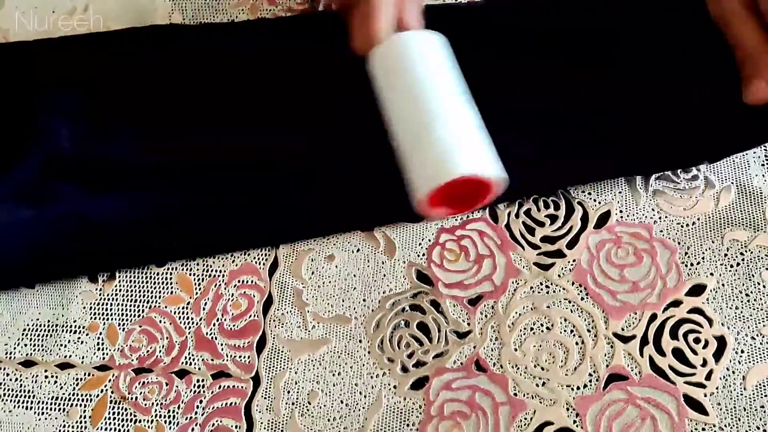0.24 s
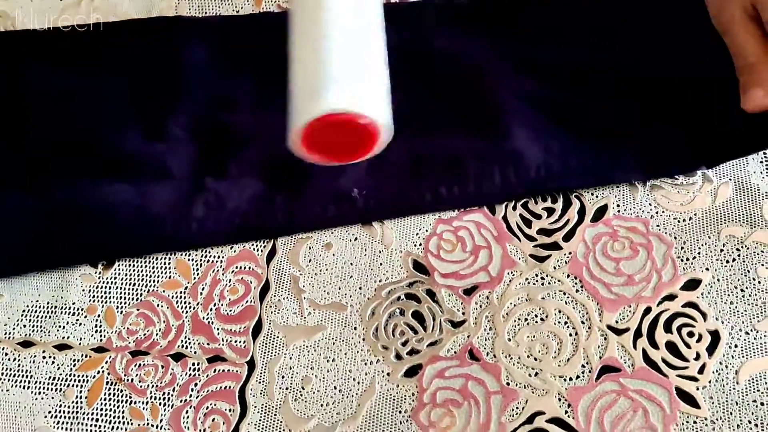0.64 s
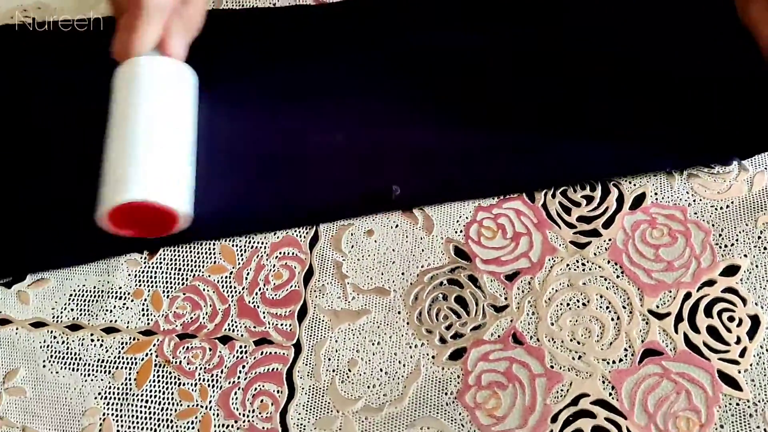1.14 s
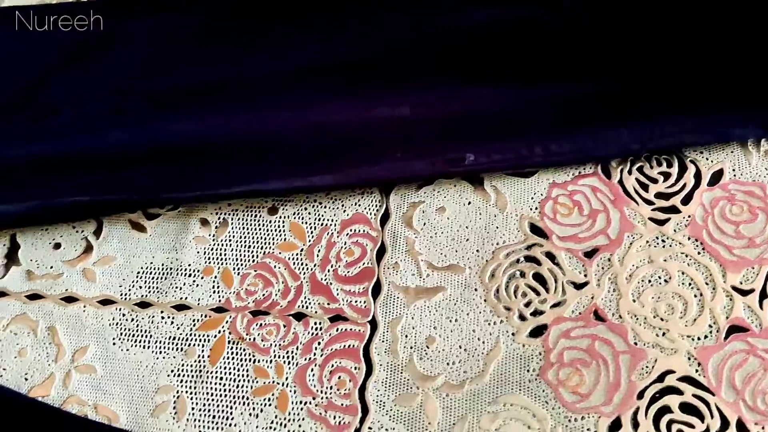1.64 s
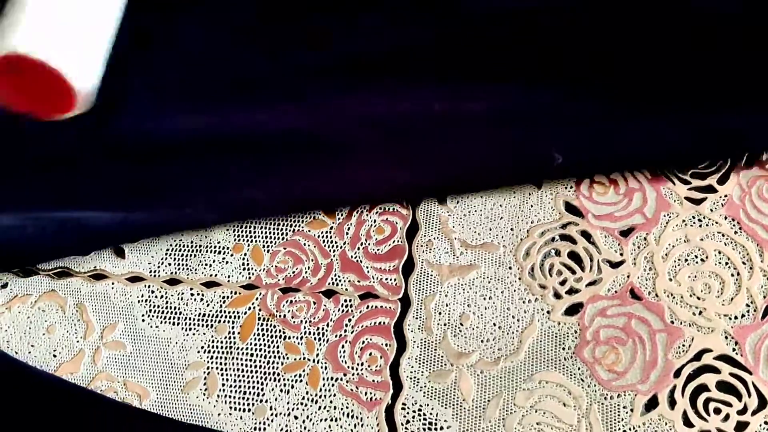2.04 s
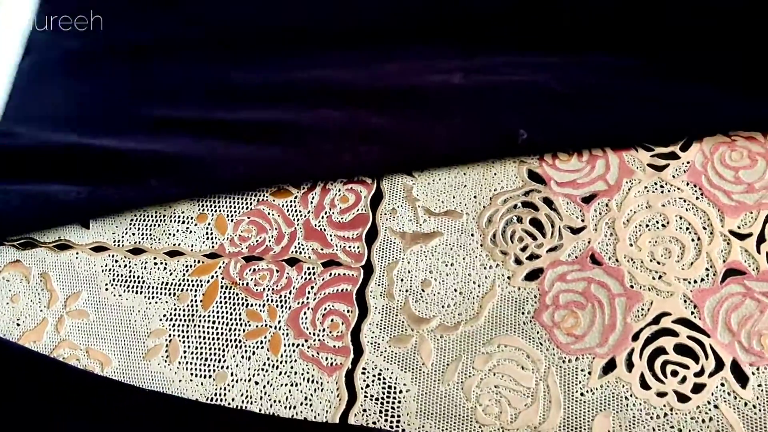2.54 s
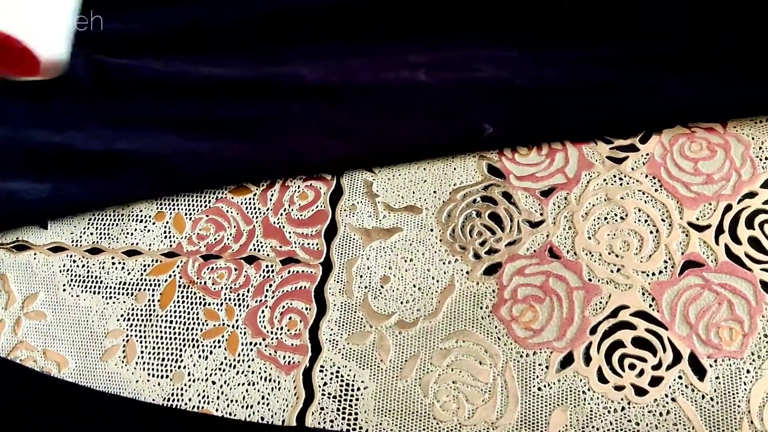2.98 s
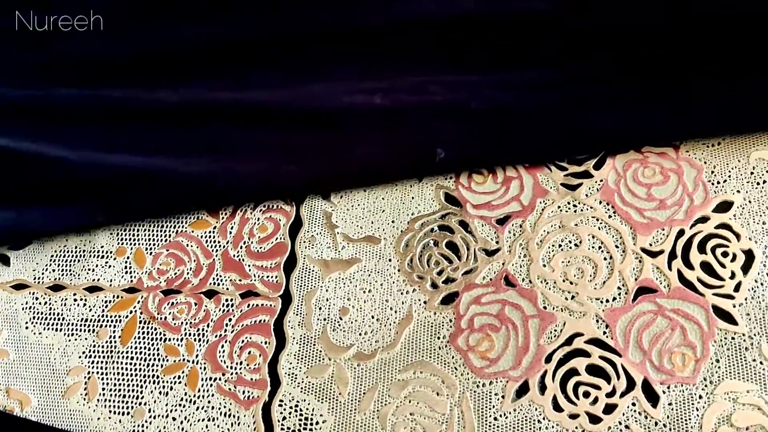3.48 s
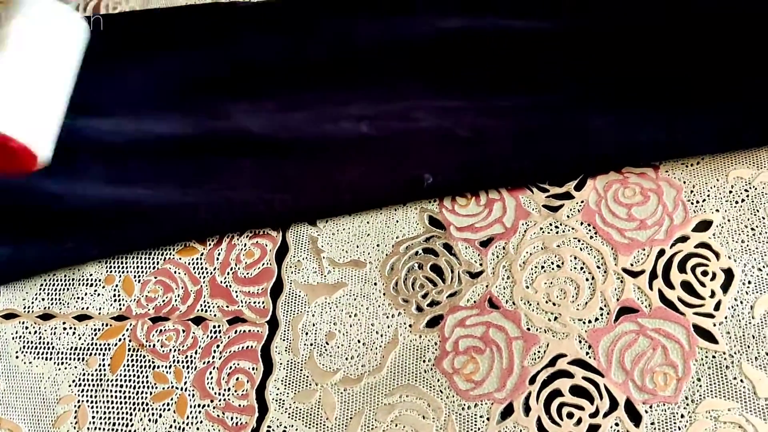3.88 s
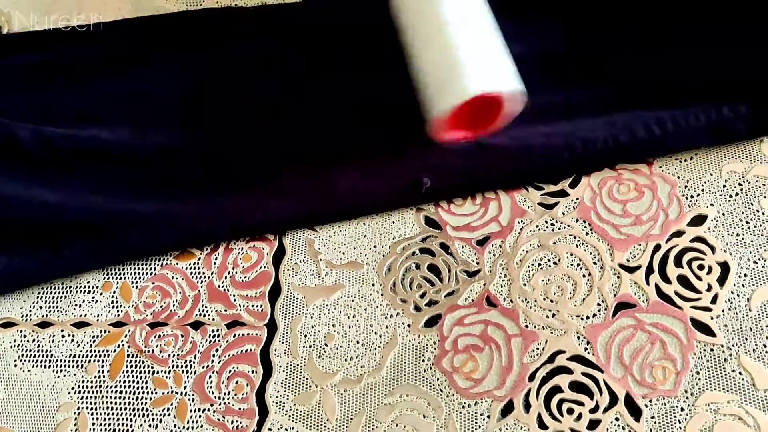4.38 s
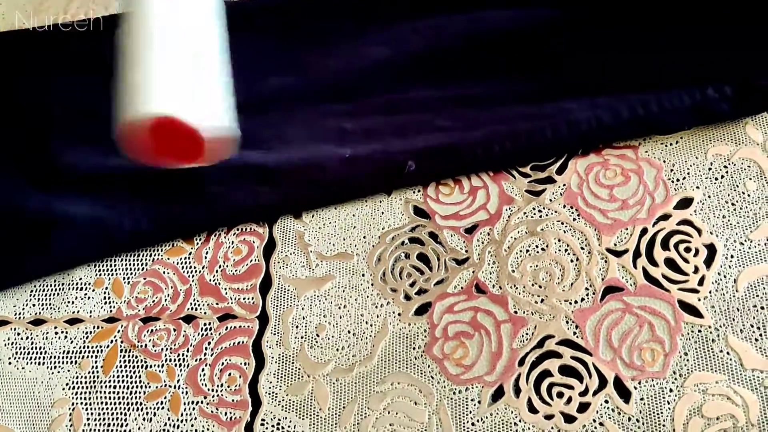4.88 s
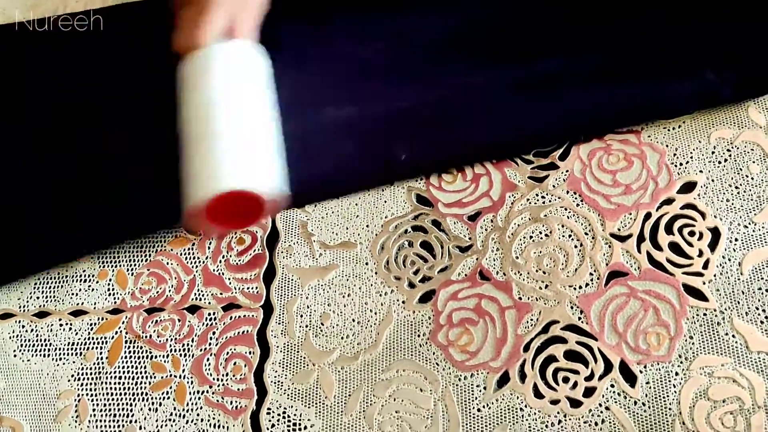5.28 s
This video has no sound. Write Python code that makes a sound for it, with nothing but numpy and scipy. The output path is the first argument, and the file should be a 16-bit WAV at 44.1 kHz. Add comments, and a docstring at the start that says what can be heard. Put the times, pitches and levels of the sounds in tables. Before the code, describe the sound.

Close stereo pickup in a small, faintly humming room: a sticky lint roller makes six short strokes on a cloth-covered table. Each is a crackling, peeling hiss over low rumble, the first gentlest, later ones heavier. The roller lands with dull thumps and plastic clicks between strokes; brief tiny squeaks come early, and wooden knocks sound off to the left after the second and fourth strokes. The last stroke is cut off.

```python
"""Lint roller on a cloth-covered table

A sticky lint roller is set down on the cloth and pushed along it in six strokes, the last cut off by the end.
Landings are force pulses and rolling is random kicks, both heard through the modes of the table top.
The tape peels off the fibres with a crackling hiss: countless random snaps, coloured and swelling per stroke.
The plastic core clicks and squeaks as decaying modes and short tones; wooden knocks off to the left are
filtered impulses with a ring. Noise and steady tones make a small, faintly humming room."""
import sys
import numpy as np
from scipy import signal
from scipy.fft import rfft, irfft, next_fast_len
from scipy.io import wavfile
from scipy.ndimage import uniform_filter1d, map_coordinates

SR = 44100
rng = np.random.default_rng(int(sys.argv[2]) if len(sys.argv) > 2 else 0)


def dump(signal):
    """Clip the signal to [-1, 1] and save it as 16-bit WAV at the path in sys.argv[1]."""
    limited = np.clip(np.atleast_2d(signal).T, -1, 1)
    pcm = np.round(limited * 32767).astype(np.int16)
    wavfile.write(sys.argv[1], SR, pcm)


N = 243431

# strokes of the roller, levels relative, fall_s for 20 dB of hiss, leads of the left microphone:
# start_s, stop_s, hiss_db, rumble_db, pressure_gained_db, fall_s, first_lead_ms, last_lead_ms
STROKES = [(0.049, 0.488, -54, -50.5, 4, 0.0959, 0.305, -0.029),
           (1.151, 1.605, -49, -41.5, 2, 0.2172, 0.064, 0.3096),
           (2.473, 2.796, -49, -40.5, -2.5, 0.1232, 0.0865, 0.2747),
           (3.365, 3.631, -47.5, -37, -0.14, 0.1823, 0.1314, .32),
           (4.505, 4.789, -47.5, -32, 1, 0.1042, -0.045, 0.2523),
           (5.321, 5.617, -49, -32.5, -1.5, -0.05, -0.0413, 0.283)]
# relative spectrum of tape peeling off cloth: pitch_hz, level_db (per Hz)
PEEL_SPECTRUM = [(100, -35.5), (450, -9), (750, 6.5), (1200, 3.5), (2000, 4), (3500, 3), (5000, 3.5),
                 (6700, 4.5), (9000, -1.5), (15000, -14.5)]


def amp(db):
    """The decibel law: level to amplitude gain."""
    return 10 ** (np.asarray(db) / 20)


def unit(x):
    """Normalisation by mean power: scaled to rms 1."""
    return x / np.sqrt(np.mean(x ** 2) + 1e-20)


def clock(count):
    """Uniform sampling: seconds for count samples."""
    return np.arange(count) / SR


def along(points, hz):
    """Logarithmic pitch scale: (Hz, value) points interpolated on it."""
    f, v = np.transpose(points)
    return np.interp(np.log(hz + 1), np.log(f + 1), v)


def wobble(rate):
    """Band-limited randomness: a smooth curve through rate random knots a second."""
    knots = rng.standard_normal(int(N * rate / SR) + 4)
    return map_coordinates(knots, [clock(N) * rate])


def swell(start, stop, rise_s, fall_s):
    """Exponential growth and decay: gain 1 from start to stop; rise and fall are times for 20 dB."""
    t = clock(N)
    before = np.maximum(start - t, 0) / rise_s
    after = np.maximum(t - stop, 0) / fall_s
    return amp(-20 * (before + after))


def filtered(x, response):
    """Linear filtering: the spectrum of x times a response of frequency."""
    n = x.shape[-1]
    m = next_fast_len(n + SR // 2)
    return irfft(rfft(x, m) * response(np.fft.rfftfreq(m, 1 / SR)), m)[..., :n]


def stereo(pair, spectrum):
    """Interchannel coherence: two unrelated signals become coloured left and right, rms 1, alike in the bass."""
    # left-right likeness: pitch_hz, correlation
    likeness = [(60, 0.96), (130, 0.993), (290, 0.883), (640, 0.358), (1400, 0.018), (3000, 0.067)]

    def turn(hz):
        return np.arccos(np.clip(along(likeness, hz), -1, 1)) / 2

    def mid_side(hz):
        return amp(along(spectrum, hz)) * [np.cos(turn(hz)), np.sin(turn(hz))]

    mid, side = filtered(pair, mid_side)
    return unit(np.array([mid + side, mid - side]))


def patchy(x, depth_db):
    """Time-varying spectrum: a smooth random field shifts the colour of x from moment to moment."""
    z = signal.stft(x, nperseg=512)[2]
    field = uniform_filter1d(rng.standard_normal(z.shape), size=9, axis=0)  # across frequency
    field = uniform_filter1d(field, size=11, axis=1)  # across time
    return signal.istft(z * amp(depth_db * unit(field)), nperseg=512)[1][:N]


def ring(hz, t60):
    """Damped vibration: one mode that falls 60 dB in t60 seconds."""
    t = clock(SR // 2)
    return np.sin(2 * np.pi * hz * t) * np.exp(-np.log(1000) * t / t60)


def blow(spectrum, size=SR // 2):
    """Minimum phase: a folded cepstrum gives a causal impulse of the given colour, peak 1."""
    cepstrum = irfft(np.log(amp(along(spectrum, np.fft.rfftfreq(size, 1 / SR)))), size)
    cepstrum[1:size // 2] *= 2
    cepstrum[size // 2:] = 0
    pulse = irfft(np.exp(rfft(cepstrum)), size)
    return pulse / np.abs(pulse).max()


def add(track, s, sound):
    """Superposition: a sound mixed into the track at time s."""
    part = track[:, round(s * SR):][:, :sound.shape[-1]]
    part += sound[..., :part.shape[-1]]


def room(x, early_db=5, early_s=0.048):
    """Reverberation: convolution with decaying noise, stronger early on, whose decay depends on pitch."""
    # decay of the room: pitch_hz, t60_s
    wall_decay = [(100, 0.124), (500, 0.573), (1400, 0.3866), (4000, 0.392), (10000, 0.217)]
    noise = stereo(rng.standard_normal((2, SR // 2)), [(100, 0)])
    hz, t, z = signal.stft(noise, SR, nperseg=256)
    decay = np.exp(-np.log(1000) * t / along(wall_decay, hz)[:, None])
    tail = signal.istft(z * decay, SR, nperseg=256)[1]
    t = clock(tail.shape[1])
    tail *= amp(early_db * np.exp(-t / early_s))
    tail *= np.clip((t - .004) / .004, 0, 1)  # silent for 4 ms, then fades in over 4 ms
    return signal.fftconvolve(x[None], unit(tail) / np.sqrt(len(t)), axes=1)


def background():
    """Stationary noise and phase-modulated tones: room air, an appliance's unsteady hum and a thin whine."""
    # room air, relative spectrum: pitch_hz, level_db (per Hz)
    air_spectrum = [(15, -8.5), (30, -3.5), (55, -0.5), (120, -19), (200, -13), (450, -23.5), (740, -20),
                    (1100, -30), (2000, -34.5), (2700, -38), (7000, -46), (15000, -54)]
    # hum of the appliance, relative levels: pitch_hz, level_db
    hum_tones = [(177.6, -64), (247.6, -68)]
    # the whine swells once, times for 20 dB: peak_s, level_db, rise_s, fall_s
    whine_swell = (4.0, -57.5, 0.2, 0.04)
    whine_hz, whine_idle_db = 749.8, -72

    def tone(hz):
        return np.sin(2 * np.pi * hz * clock(N) + 0.53 * wobble(7))

    drift = amp(1.3 * wobble(6))
    air = amp(-49.5) * stereo(rng.standard_normal((2, N)), air_spectrum)
    hum = sum(amp(db) * tone(hz) for hz, db in hum_tones)
    s, db, rise_s, fall_s = whine_swell
    whine = np.maximum(amp(whine_idle_db), amp(db) * swell(s, s, rise_s, fall_s))
    return drift * (air + hum) + whine * tone(whine_hz)


def knocks():
    """Impact and resonance with an arrival-time difference: wood knocks further off, left first, in the room."""
    # wooden knocks, ring level relative to the strike: start_s, level_db, ring_hz, ring_db, ring_t60_s
    wood_knocks = [(1.5905, -28, 882, 1, 0.044), (1.5963, -19, 505.5, 2.5, 0.0309),
                   (1.6185, -34, 760.3, 7, 0.232), (1.738, -37.5, 936.6, -6, 0.107),
                   (3.6432, -21.5, 1023, 3.5, 0.0315), (3.6515, -19, 550, -11.5, 0.093),
                   (3.662, -28, 681, -5, 0.26), (4.1275, -34.5, 572.8, 5, 0.1715),
                   (4.134, -33, 323.5, -3, 0.088)]
    # strike of wood, relative spectrum: pitch_hz, level_db (per Hz)
    wood_spectrum = [(60, -4), (200, -6), (480, 0), (800, 3.5), (1100, -3.5), (1350, -12), (1650, -6.5),
                     (2100, -15.5), (2800, -13.5), (4500, -27), (7500, -29.5), (15000, -47.5)]
    out, lead_s = np.zeros((2, N)), .00033
    for s, db, hz, ring_db, t60 in wood_knocks:
        strike = amp(db) * blow(wood_spectrum)
        knock = strike + amp(db + ring_db) * ring(hz, t60)
        t = clock(len(knock))
        late = np.interp(t - lead_s, t, knock, left=0)
        add(out, s, np.array([knock, late]))
        strike_echo = amp(5.5) * room(strike, early_db=10, early_s=0.00996)
        add(out, s, strike_echo + amp(-11.5) * room(knock))
    return out


def place():
    """Kinematics as the left microphone's lead in ms: the roller crosses, slows, rests, goes to its next start."""
    slowing = .2  # starts faster and ends slower than the mean speed by this share of it
    overrun_s, rest_s = 0.0375, 0.142  # travel beyond each end of a stroke, and the stay there
    times, leads = [], []
    for start, stop, *_, first_ms, last_ms in STROKES:
        s = np.linspace(start - overrun_s, stop + overrun_s)
        u = (s - start) / (stop - start)
        lead_ms = first_ms + (last_ms - first_ms) * (u + slowing * u * (1 - u))
        times += [s[0] - rest_s, *s, s[-1] + rest_s]
        leads += [lead_ms[0], *lead_ms, lead_ms[-1]]
    return np.interp(clock(N), times, leads)


def from_roller(x, pan_db_per_ms=15, offset_db=-3.0):
    """Interaural cues: lead shifts arrival and level between the microphones, plus a fixed level offset."""
    lead_ms, half = place(), np.array([[.5], [-.5]])  # left, right
    when = np.arange(N) + half * lead_ms * SR / 1000
    pair = np.array([map_coordinates(x, [w]) for w in when])
    return pair * amp(half * (offset_db + pan_db_per_ms * lead_ms))


def core():
    """Modal excitation: the loose plastic core clicks on its handle and sometimes squeaks on its axle."""
    # clicks on the handle, relative levels, modes weaken above dull_hz: start_s, level_db, dull_hz
    core_clicks = [(.416, -26, 600), (0.63, -43.5, 1800), (.974, -33.5, 1000), (2.344, -33, 3004),
                   (3.243, -40, 3000), (3.519, -22.5, 555), (4.327, -20, 9000), (4.338, -30.5, 9000),
                   (4.729, -34.5, 700), (5.1732, -19, 5470)]
    # modes of the core, relative levels: pitch_hz, level_db, t60_s
    core_modes = [(659.6, -9.5, 0.0253), (973, 3, 0.0106), (1104, -18.5, 0.099), (1300, 3.5, 0.00227),
                  (1792.6, -13.5, 0.0416), (2414, -2.5, 0.00338), (2926, -13.5, 0.015), (4910, -22.5, .015),
                  (6760, -32.5, .012)]
    # squeaks on the axle, length from the centre to 1/e: centre_s, level_db, pitch_hz, length_s
    axle_squeaks = [(0.737, -54, 2480, 0.00405), (0.748, -48, 2600, 0.00227), (0.971, -52, 2308, 0.0051)]
    direct, echo, t = np.zeros((1, N)), np.zeros((2, N)), clock(N)
    for s, db, dull_hz in core_clicks:
        click = 0
        for k, (hz, level, t60) in enumerate(core_modes):
            gain = amp(db + level + rng.normal(0, 1))
            gain /= 1 + (hz / dull_hz) ** 2  # a soft contact barely excites the high modes
            click = click + (-1) ** k * gain * ring(hz, t60)  # neighbours swing in opposite directions
        add(direct, s, click)
        add(echo, s, amp(-7.5) * room(click))
    squeak = 0
    for s, db, hz, length in axle_squeaks:
        envelope = np.exp(-((t - s) / length) ** 2)
        squeak = squeak + amp(db) * envelope * np.sin(2 * np.pi * hz * t + 1.28 * wobble(560))
    return from_roller(direct[0] + squeak, pan_db_per_ms=6, offset_db=-.6) + echo


def table_top(force):
    """Modal superposition: a force is heard directly and through the modes of the table top."""
    # modes of the table top, gain at resonance relative to the direct force: pitch_hz, gain_db, t60_s
    table_modes = [(45, 17.5, 0.684), (92.725, 12, 0.762), (100.74, 0, 0.231), (116.65, 1, 0.62),
                   (128.62, 3.5, 0.344), (173.13, 7.5, 0.358), (207.38, 0, 0.216), (223.1, -8, 0.228),
                   (270.9, -6.5, 0.66), (295.16, 5, 0.366), (344.3, 1.5, 0.214), (392.2, -5, 0.4),
                   (482, -23.5, 0.6), (570, -16.5, 0.57)]
    response = 0
    for hz, db, t60 in table_modes:
        per_sample = 2 * np.log(1000) / (t60 * SR)  # evens out long and short rings
        response = response + amp(db) * per_sample * ring(hz, t60)
    response[0] += 1
    return signal.fftconvolve(force, response[None], axes=1)[:, :force.shape[1]]


def landings():
    """Contact time sets bandwidth: the padded roller pushes the table down and it springs back."""
    # landings, peak force as a relative level, time scale of the contact: centre_s, level_db, contact_s
    roller_landings = [(0.017, -41.5, 0.036), (0.112, -40, 0.0096), (0.9728, -24, 0.003104),
                       (2.3449, -12, 0.00195), (3.2425, -14, 0.002405), (4.3255, -26, 0.00341),
                       (5.1655, -20.5, 0.002775)]
    force = np.zeros(N)
    for s, db, contact in roller_landings:
        u = (clock(N) - s) / contact
        push = u / (1 + u ** 2) ** 4  # one smooth down-and-up swing
        force += amp(db) * push / push.max()
    return table_top(force[None]) + amp(-10) * room(force)[:, :N]


def effort():
    """Envelopes of hiss and rumble: each stroke runs up, changes with pressure and runs out; hiss also arches."""
    run_up_share = 0.3003  # the last 20 dB are gained in this share of a stroke's length
    arch_db = 1.26  # mid-stroke hiss above that at the ends, apart from pressure
    lean_s, ease_s = 0.0279, 0.0413  # the hand's weight comes on late and off early
    rumble_fall_s = 0.172  # for 20 dB
    rumble_grows = 1.19  # dB of rumble per dB of pressure
    hiss, rumble = amp(-80.5), amp(-60.5)  # floors: cloth and table between the strokes
    for start, stop, hiss_db, rumble_db, press_db, fall_s, _, _ in STROKES:
        u = np.interp(clock(N), [start, stop], [0, 1])
        pressure_db = press_db * (u - .5)
        mid_db = arch_db * (np.sin(np.pi * u) - 2 / np.pi)
        rise_s = run_up_share * (stop - start)
        stroke_hiss = amp(hiss_db + pressure_db + mid_db) * swell(start, stop, rise_s, fall_s)
        weight = swell(start + lean_s, stop - ease_s, rise_s, rumble_fall_s)
        hiss = np.maximum(hiss, stroke_hiss)
        rumble = np.maximum(rumble, amp(rumble_db + rumble_grows * pressure_db) * weight)
    return hiss, rumble


def rolling():
    """Random impact excitation: folds kick the table, more crisply under pressure; deep sway varies less."""
    # kicks of the folds, relative spectrum: pitch_hz, level_db (per Hz)
    bump_spectrum = [(20, -28.5), (45, -7), (80, -1), (130, 3.5), (200, 0), (300, -6), (450, -14.5),
                     (800, -19), (1500, -51.5), (4000, -88)]
    # deep sway of the table, relative spectrum: pitch_hz, level_db (per Hz)
    sway_spectrum = [(15, -38.5), (35, -2.5), (50, -1.5), (70, -5.5), (110, -15.5), (250, -41.5),
                     (1000, -93)]
    # above firm_db of rumble, bumps above firm_hz gain this many extra dB per dB
    firm_db, firm_hz, brightens = -37.5, 231, 0.177
    pressure_db = 20 * np.log10(effort()[1])
    folds = (rng.random(N) < 110 / SR) * rng.choice([-1, 1], N)  # 110 a second on average
    kicks = np.array([unit(folds) + .6 * rng.standard_normal(N), rng.standard_normal(N)])
    bumps = unit(table_top(stereo(kicks, bump_spectrum)))
    dull = filtered(bumps, lambda hz: 1 / (1 + (hz / firm_hz) ** 8))
    bumps = dull + (bumps - dull) * amp(brightens * np.maximum(pressure_db - firm_db, 0))
    sway = unit(table_top(stereo(rng.standard_normal((2, N)), sway_spectrum)))
    bump_gain = amp(pressure_db + 0.96 * wobble(40))
    sway_gain = amp(0.4415 * pressure_db - 26.5)
    return bump_gain * bumps + sway_gain * sway


def crackle(fibres_per_s, size_db, clump_db):
    """Shot noise: countless fibres snap free of the glue, in clumps of a few milliseconds; rms 1."""
    sizes = rng.standard_normal(N) * amp(size_db * rng.standard_normal(N))
    snaps = (rng.random(N) < fibres_per_s / SR) * sizes
    snaps = patchy(snaps * amp(clump_db * wobble(420)), depth_db=2.5)
    return unit(filtered(snaps, lambda hz: amp(along(PEEL_SPECTRUM, hz))))


def peeling():
    """Adhesive release: tape peels off the cloth in travel and lift; the room adds a diffuse hiss."""
    # tape lets go as the roller lifts, relative levels, times for 20 dB: peak_s, level_db, rise_s, fall_s
    tape_lifts = [(.63, -54.5, 0.0844, 0.0033), (.69, -62.5, 0.18, 0.12), (2.02, -64, .35, 0.22),
                  (3.01, -55.5, 0.1019, 0.2063), (3.85, -57, 0.12, 0.0769), (4.935, -57, 0.07, .24)]
    # tape snatches at the cloth, relative levels, length from the centre to 1/e: centre_s, level_db, length_s
    tape_snatches = [(0.967, -51, 0.00136), (2.343, -52.5, 0.0041), (3.242, -50.5, 0.003),
                     (3.272, -57.5, 0.0031), (3.879, -59.5, .003), (4.331, -44, 0.00517),
                     (4.339, -60, 0.0473), (5.191, -50.5, 0.018), (5.206, -60, 0.055)]
    t = clock(N)
    lifts = sum(amp(db) * swell(s, s, rise_s, fall_s) for s, db, rise_s, fall_s in tape_lifts)
    grip = np.hypot(effort()[0], lifts) * amp(2.5 + .4 * wobble(60))
    for s, db, length in tape_snatches:
        grip = grip + amp(db) * np.exp(-((t - s) / length) ** 2)
    near = from_roller(crackle(fibres_per_s=14000, size_db=2, clump_db=1.8))
    diffuse = stereo(rng.standard_normal((2, N)), PEEL_SPECTRUM)
    return grip * (amp(-2.5) * near + amp(-3.5) * diffuse)


def scene():
    """Superposition of everything that reaches the two microphones."""
    return background() + knocks() + core() + landings() + rolling() + peeling()


def record(dry):
    """Band limitation: the microphone is dull in its top octave and passes nothing above its limit."""
    # response of the microphone: pitch_hz, gain_db
    mic_response = [(7000, 0.5), (7700, -2.5), (8300, -8), (8900, -14.5), (10000, -12), (15000, -7)]
    top_hz = 15450
    return filtered(dry, lambda hz: amp(along(mic_response, hz)) * (hz < top_hz))


dry = scene()
out = record(dry)
dump(out)
```